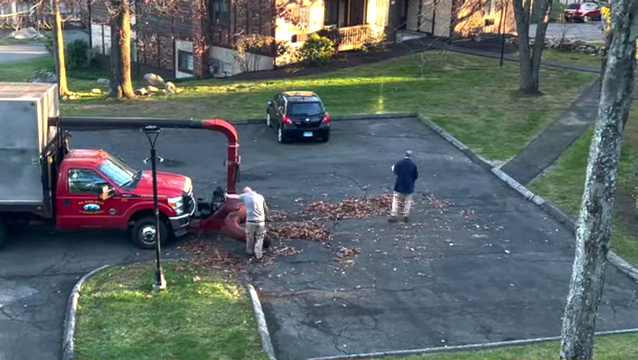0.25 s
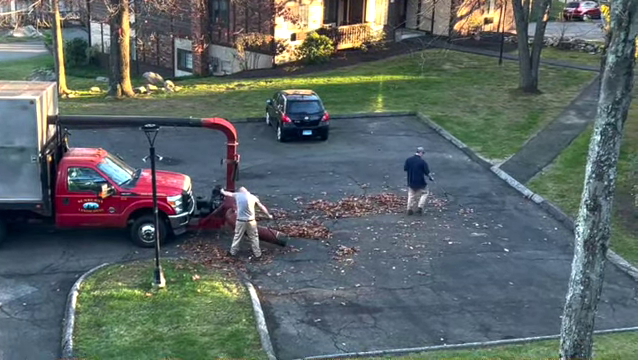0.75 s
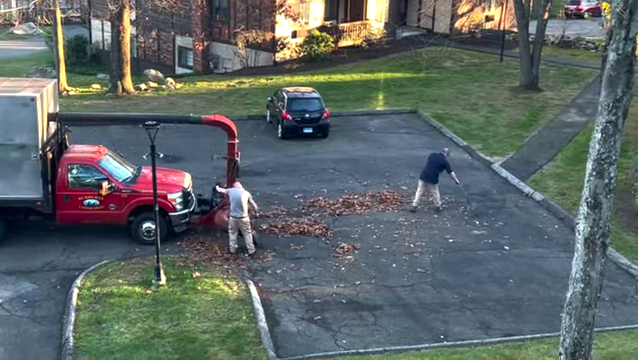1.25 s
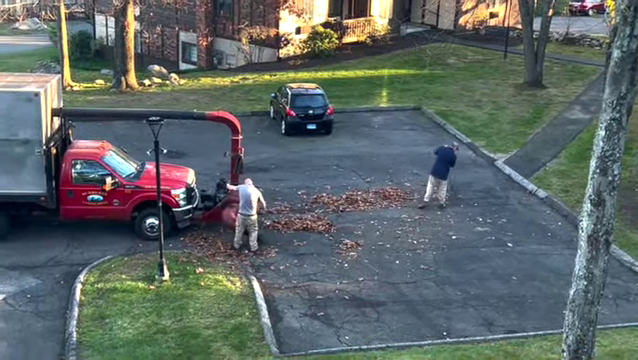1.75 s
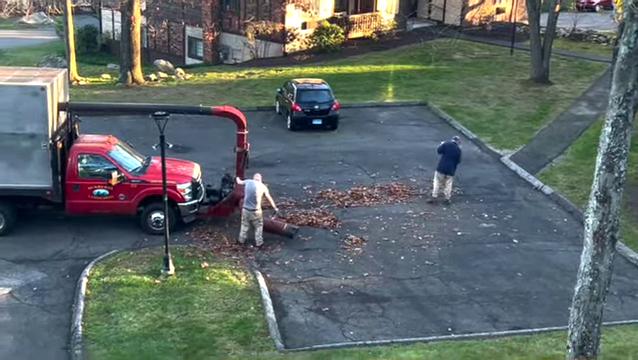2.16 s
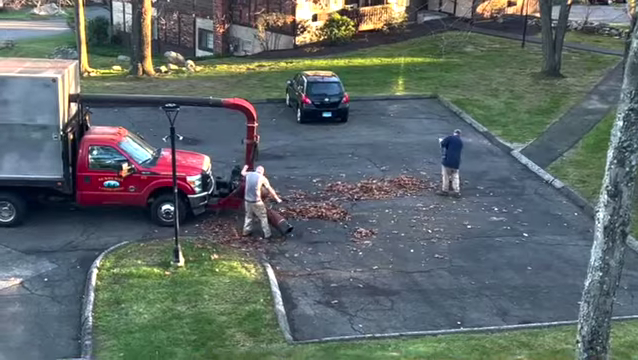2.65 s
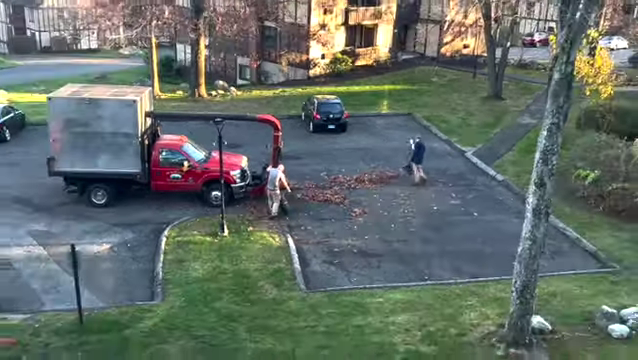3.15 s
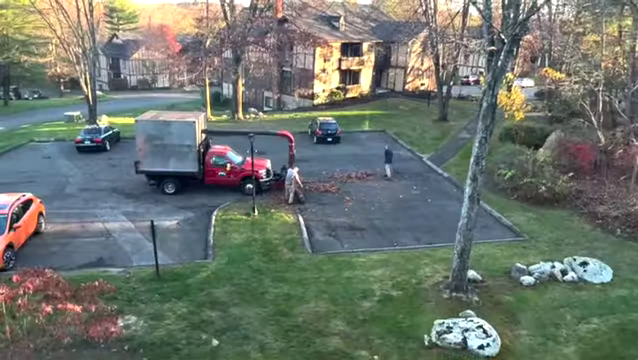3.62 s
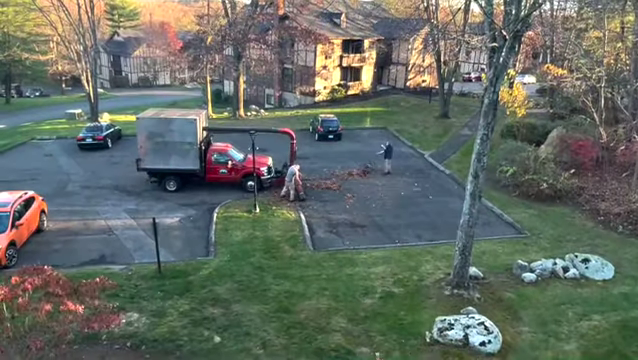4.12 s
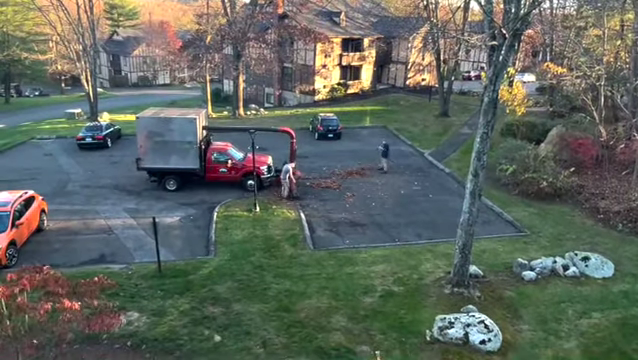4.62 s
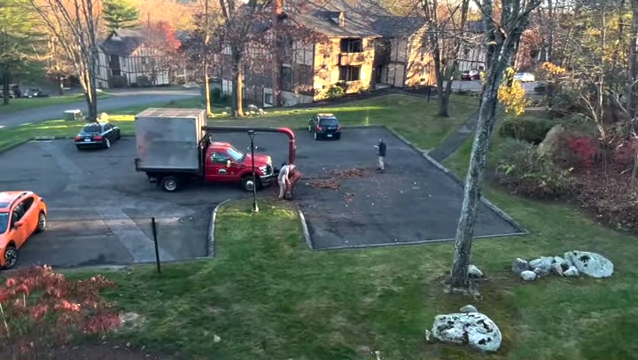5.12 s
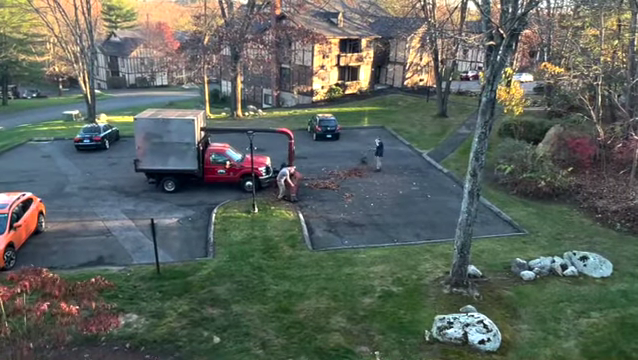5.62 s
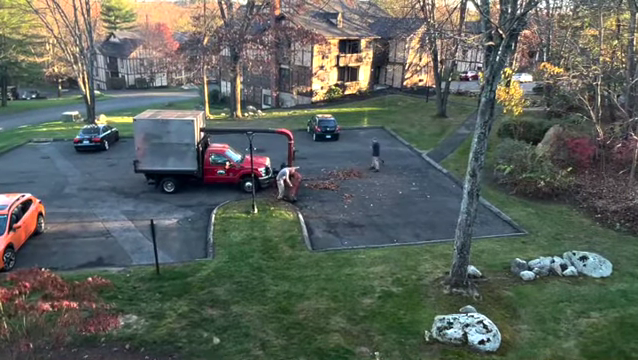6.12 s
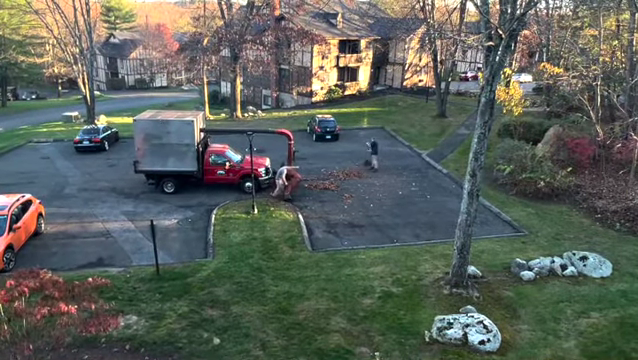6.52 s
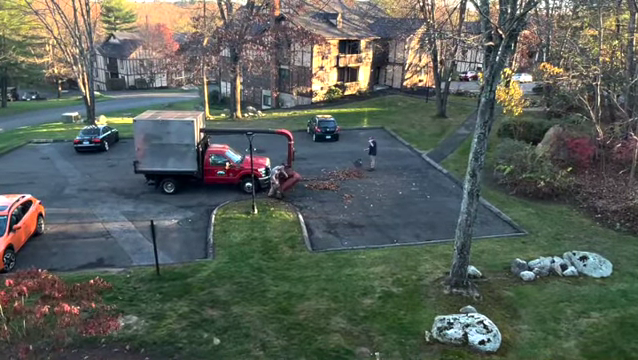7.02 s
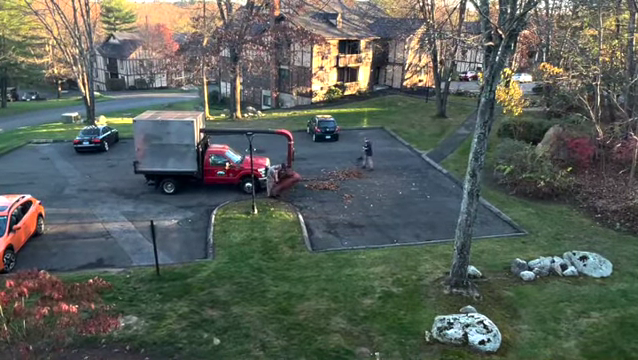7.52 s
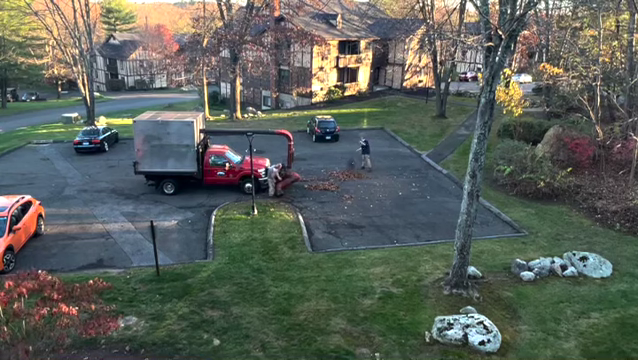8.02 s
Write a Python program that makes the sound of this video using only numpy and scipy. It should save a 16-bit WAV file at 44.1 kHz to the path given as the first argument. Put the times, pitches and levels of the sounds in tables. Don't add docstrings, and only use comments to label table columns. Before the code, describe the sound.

A leaf vacuum on a truck runs continuously in a parking lot, heard from a window above. Its uneven two-cylinder engine throbs at a fixed pitch under a wavering fan hum. Air roars through the wide hose, and leaves hiss in irregular gulps. Occasional hollow exhaust cracks poke through. The phone sound starts narrow and focused, then abruptly opens into wider stereo.

```python
import sys
import numpy as np
from scipy import signal
from scipy.fft import rfft, irfft, next_fast_len
from scipy.io import wavfile
from scipy.ndimage import uniform_filter1d, minimum_filter1d

SR = 44100
rng = np.random.default_rng(int(sys.argv[2]) if len(sys.argv) > 2 else 0)


def to_wav(s):
    ch = np.atleast_2d(s).T
    pcm = np.round(np.clip(ch, -1, 1) * 32767)
    wavfile.write(sys.argv[1], SR, pcm.astype(np.int16))


def boost(x):
    u = np.asarray(x, float) / 20
    return 10 ** u


N = 364707
STEP = 32
TIME = np.arange(0, N + STEP, STEP) / SR
CLOCK = np.arange(N) / SR
CYCLE_HZ = 24.0
WIDEN_S = 3.37


def fine(control):
    return np.interp(CLOCK, TIME, control)


def bumps(rows):
    return sum(db * np.exp(-((TIME - s) / half_s) ** 2) for s, half_s, db in rows)


def walk(rate_hz):
    k = int(SR / STEP / rate_hz)
    held = np.repeat(rng.standard_normal(len(TIME) // k + 1), k)
    slewed = uniform_filter1d(uniform_filter1d(held, k), k)
    return 1.23 * slewed[:len(TIME)]


def read(table, hz):
    f, db = np.transpose(table)
    return np.interp(np.log(hz + 1), np.log(f), db)


def causal(db):
    cep = irfft(db * np.log(10) / 20)
    half = len(cep) // 2
    cep[1:half] *= 2
    cep[half + 1:] = 0
    return np.exp(rfft(cep))


# (multiple of cycle rate [1], level [dB], left minus right [dB])
EXHAUST_LINES = [(1.95, -40, 2), (3.08, -31.5, 0.5), (3.893, -40, 2), (5.037, -25, -2), (5.927, -46.5, 2.5),
                 (7.014, -26.5, 0), (8.05, -39.5, -3.5), (8.93, -32.5, -6), (10.06, -30.5, 0),
                 (11.1, -58, 1.5), (11.8, -54.5, -2.5), (13.04, -37.5, 1.5), (13.81, -37, -3.5),
                 (15.2, -44, 1.5), (15.7, -49.5, 2.5), (16.6, -60.5, -5), (17, -51, -2.5),
                 (18.7, -55.5, 14.5), (20.1, -57, 0), (22.06, -51.5, -2.5), (21.9, -58, -1),
                 (23.3, -60.5, 3.5), (22.6, -61.5, -2.5), (24.64, -51, 1.5), (25.4, -45.5, -10),
                 (25.3, -57, -10.5), (28.55, -58, 10), (28.3, -45, 8.5), (30.47, -55, 4.5)]


def engine(rear_hz=192, rear_db=-1, scatter_db=.5, jitter_s=0.0002):
    firing_shares = .043, .631
    size, early, lead_cycles = 2 ** 14, 2 ** 12, 6
    hz = np.arange(size // 2 + 1) * SR / size
    order, db, pan_db = np.transpose(EXHAUST_LINES)

    rear = boost(rear_db) / (1 + 1j * order * CYCLE_HZ / rear_hz)
    pair = 1 + rear * np.exp(-2j * np.pi * order * (firing_shares[1] - firing_shares[0]))
    db = db - 20 * np.log10(np.abs(pair) * np.sqrt(2) * CYCLE_HZ / SR)
    edges_db = -40 * np.maximum(2 - hz / CYCLE_HZ, 0) - 24 * np.log2(np.maximum(hz / 800, 1))
    pipe = np.array([causal(np.interp(hz / CYCLE_HZ, order, db + side * pan_db / 2) + edges_db)
                     for side in (1, -1)])

    cycle = np.arange(int(N / SR * CYCLE_HZ) + lead_cycles)
    start = int(lead_cycles * SR / CYCLE_HZ)
    colours = 1, boost(rear_db) / (1 + 1j * hz / rear_hz)
    out = 0
    for share, colour in zip(firing_shares, colours):
        ring = np.roll(irfft(pipe * colour * np.exp(1.4j)), early, axis=1)
        jitter, scatter = rng.standard_normal((len(cycle), 2)).T
        fire_s = (cycle + share) / CYCLE_HZ + jitter_s * jitter
        train = np.zeros((1, N + 2 * start))
        train[0, (fire_s * SR).astype(int)] = boost(scatter_db * scatter)
        out = out + signal.fftconvolve(train, ring, axes=1)[:, start + early:start + early + N]
    return out


BLADE_DB = -29.5, -30.5, -43.5, -40
BLADE_WANDER_DB = 0.69, 0.98, 4.1, 1.2
# (time [s], half length [s], change [dB])
BLADE_SWELLS = [
    [(0.0, 0.51, -6), (.85, 0.44, 11.5), (2.38, 0.31, 12.5), (2.8, 0.23, 5), (3.1, 0.17, 2), (3.7, .25, 4.5), (4.2, 0.18, -2.5), (8.25, .2, 4)],
    [(.4, 0.6, -7), (1.9, .35, 3.5), (2.55, 0.44, 5.5), (3.58, 0.13, -10), (3.9, .15, 2.5), (7.0, 0.076, 2.5), (7.36, 0.16, -10.5), (7.6, 0.093, 3.5), (8.2, 0.16, 3.5)],
    [(0.0, 0.11, 2), (.45, 0.093, 3), (1.9, .25, 8.5), (3.2, .12, 7), (3.8, 0.11, 8.5), (4.85, 0.1, 9), (7.1, 0.21, 10), (7.75, 0.26, -16)],
    [(.4, 0.28, 5), (1.5, 0.12, -15), (2.1, 0.12, 8), (3.85, .12, 2.5), (4.95, 0.11, 6.5), (7.0, 0.091, 0)],
]
# (narrow beam [dB], wide beam [dB], sway [dB])
BLADE_PAN = [(-1.5, -9, 2.5), (-0.5, 3, 2), (-5, -5.5, 0), (-3, -3, 0)]
# (multiple of cycle rate [1], level [dB])
FIN_LINES = [(34, -53), (36, -48.5), (48, -52.5), (63, -55), (64, -71), (66, -56.5), (84, -54)]


def impeller(wide):
    shaft = 2 * np.pi * CYCLE_HZ * CLOCK
    opened = fine(wide)
    pans_db = [near + wide * (far - near) + sway * walk(3) for near, far, sway in BLADE_PAN]
    levels_db = [db + bumps(rows) + wander * walk(4)
                 for db, rows, wander in zip(BLADE_DB, BLADE_SWELLS, BLADE_WANDER_DB)]
    lags_rad = -.4 * wide - .15, -.1 + 0 * wide, 1.0 * wide, 0.099 + 0.29 * wide
    out = 0
    for k, (db, pan, lag) in enumerate(zip(levels_db, pans_db, lags_rad), 1):
        db = db + .5 * k * walk(9)
        drift = 0.59 * walk(1.48) + 0.051 * k ** 2 * walk(12)
        phase = k * (8 * shaft + .75) - 1.7
        out = out + np.array([fine(boost(db + side * pan / 2)) * np.cos(phase + fine(drift + side * lag))
                              for side in (1, -1)])
    for order, db in FIN_LINES:
        phase = order * shaft + fine(1.5 * walk(2.5))
        level = fine(boost(db + 3 * walk(3.03)))
        out = out + level * np.array([np.sin(phase), np.sin(phase + opened * order)])
    return np.sqrt(2) * out


# (frequency [Hz], density [dB per Hz])
DUCT_ROAR = [
    [(30, -67.5), (45, -61), (60, -48.5), (85, -51), (130, -51.5), (200, -47.5), (330, -53), (400, -55), (500, -61.5), (590, -55), (700, -64.5), (870, -60.5)],
    [(30, -65), (45, -53), (60, -53.5), (85, -48.5), (130, -52), (200, -51.5), (330, -52), (400, -57.5), (500, -65), (590, -58.5), (700, -62), (870, -62.5)],
]
# (frequency [Hz], density [dB per Hz])
LEAF_HISS = [
    [(1000, -69), (1200, -69.5), (1350, -69.5), (1500, -67.5), (1750, -73.5), (2100, -74.5), (2500, -73), (3000, -74.5), (3800, -76.5), (4500, -78), (5300, -80.5), (6300, -80.5), (7500, -82), (9000, -85)],
    [(1000, -71), (1200, -68.5), (1350, -71.5), (1500, -70.5), (1750, -75), (2100, -70.5), (2500, -77), (3000, -78.5), (3800, -79.5), (4500, -78.5), (5300, -82.5), (6300, -82), (7500, -87), (9000, -87)],
]
# (frequency [Hz], level [dB])
NOISE_WIDTH = [
    [(40, -22), (100, -18), (250, -12.5), (350, -20), (900, -12), (1700, -12), (2500, -18), (3300, -18), (8500, -36), (9300, 4.5), (9700, 11), (10500, 9.5), (11200, -10)],
    [(40, -20), (100, -11.5), (250, -9.5), (350, -11.5), (900, -5), (2000, -0.5), (3200, 4), (5200, 2.5), (6600, -0.5), (7100, 6.5), (8100, 3), (8800, -3), (9700, 12.5), (10500, 9), (11200, -10.5)],
]
# (frequency [Hz], left minus right [dB])
NOISE_LEAN = [(60, 2), (100, -4), (180, -6), (320, 2), (550, -2.5), (960, 0.5), (1680, -5.5), (2930, -0.5),
              (5100, 4.5), (8890, 1.5)]
# (time [s], half length [s], rise [dB])
GULPS = [(0.0, 0.18, 6), (.55, 0.34, 2.8), (.78, 0.067, 1.5), (1.03, .04, 3.5), (1.3, 0.17, 2.5),
         (1.59, .14, 5), (1.9, 0.05, 2.5), (2.82, 0.2, 4), (3.04, 0.066, 2), (3.215, 0.021, 5.5),
         (3.98, .15, 5.5), (4.78, 0.066, 3), (5.05, 0.13, 4), (5.32, 0.15, 8), (5.7, 0.1, 4),
         (5.92, 0.15, 5.5), (6.04, 0.028, 3), (6.35, 0.12, 3), (6.55, 0.13, 3.5), (6.8, 0.15, 8.5),
         (7.02, 0.12, 6), (7.17, 0.056, 2.5), (7.43, 0.16, 4), (7.75, 0.11, 3), (7.99, .13, 7.5),
         (8.17, .06, 1.5)]
# (time [s], half length [s], change [dB])
SURGES = [
    (.65, 0.42, -5.5),
    (1.55, .2, -6),
    (1.95, 0.27, -0.5),
    (2.9, .5, -2),
    (4.35, 0.39, 3.5),
    (5.75, .15, 2.5),
    (8.05, .1, -0.5),
]


def air(wide, puff_db=3, puff_share=0.075, flicker_db=1.0, patch_db=0.97):
    duct_dip = 265, -55.5
    duct_share, duct_rise_db_per_s, duct_flutter_db = .3, 0.2, 1.45
    size = next_fast_len(N, True)
    hz = np.arange(size // 2 + 1) * SR / size

    white = rfft(rng.standard_normal((2, size)))
    beams = []
    for roar, hiss, width in zip(DUCT_ROAR, LEAF_HISS, NOISE_WIDTH):
        density = sorted([*map(tuple, roar), duct_dip, *map(tuple, hiss), (9700, -99), (11300, -95)])
        mid_db = read(density, hz) + 10 * np.log10(SR / 2)
        side_db = mid_db + read(width, hz)
        beams.append(irfft(white * boost([mid_db, side_db]), size)[:, :N])
    opened = fine(wide)
    mid, side = beams[0] + opened * (beams[1] - beams[0])
    ears = rfft(np.array([mid + side, mid - side]), size)

    def around_mean(db):
        return db - np.where(wide > .5, db[wide > .5].mean(), db[wide <= .5].mean())

    gulps = bumps(GULPS)
    rise = duct_rise_db_per_s * np.minimum(TIME, WIDEN_S)
    duct = around_mean(duct_share * gulps + rise + duct_flutter_db * walk(20))
    rumble = around_mean(bumps(SURGES))
    leaves = around_mean(gulps + 0.77 * walk(45))

    cycles = TIME * CYCLE_HZ
    strength = .6 * rng.exponential(1, int(cycles[-1]) + 2)
    puff = strength[cycles.astype(int)] * np.exp(-(cycles % 1) / puff_share)

    out = 0
    octaves = np.log2((hz + 1) / 1000)
    for octave in np.arange(-7, 8) / 2:
        part = np.searchsorted(octaves, octave + 1 / 2)
        floor = -1 * (octave > -3.5)
        mask = np.cos(np.pi / 2 * np.clip(2 * (octaves[:part] - octave), floor, 1)) ** 2
        to_leaves = np.clip(octave / 1.57 - .3, 0, 1)
        db = 0.89 * rumble * np.clip(-2 - octave, 0, 1)
        db = db + np.clip(octave + 1.0, 0, 1) * ((1 - to_leaves) * duct + to_leaves * leaves)
        db = db + flicker_db * walk(9) + patch_db * to_leaves * walk(25)
        db = db + puff_db * np.exp(-(octave + .4) ** 2 / 0.59) * puff
        lean_db = read(NOISE_LEAN, 1000 * 2 ** octave) * np.array([[.5], [-.5]])
        lean = 1 + opened * (boost(lean_db) - 1)
        out = out + fine(boost(db)) * lean * irfft(ears[:, :part] * mask, size)[:, :N]
    return out


# (time [s], peak [dB])
PUFFS = [(0.124, -26), (0.167, -23.5), (0.292, -17), (0.666, -20), (0.75, -29), (0.792, -17.5),
         (0.834, -24.5), (1.95, -24.5), (3.501, -22), (3.584, -29), (4.124, -23), (4.291, -24),
         (4.953, -22), (4.999, -22), (5.497, -27), (6.249, -16.5), (6.5, -16), (6.573, -26), (7.084, -29),
         (7.416, -26.5), (7.458, -22), (7.792, -35)]


def cracks(shell_hz=760, ring_s=0.0049, rise_s=0.00098, under_db=-0.8):
    out = np.zeros(N)
    age = CLOCK[:1200]
    pitches = 1 + .07 * rng.standard_normal(len(PUFFS))
    for (s, db), pitch in zip(PUFFS, pitches):
        envelope = (1 - np.exp(-age / rise_s)) * np.exp(-age / ring_s)
        ring = envelope * np.sin(2 * np.pi * shell_hz * pitch * age)
        i = int(s * SR)
        out[i:i + len(age)] += 1.7 * boost(db + under_db) * ring
    return out * boost([[-1], [1]])


def scene():
    wide = np.clip((TIME - WIDEN_S) / 0.054, 0, 1)
    return engine() + cracks() + impeller(wide) + air(wide)


# (time [s], level [dB])
MUTE = [
    (0, -13),
    (3.4, -13),
    (4.5, -10.5),
    (5.0, -6.5),
    (8.27, -6),
]


def mute_bands(stereo, side_db=-17, quiet_db=-74.5, quiet_hz=10500, luck_db=2.2, spare=.3, gap_sigma=1.8,
               count=10):
    starved_hz, starved_db = (6900, 8200), 3
    blip_sigma = .7, 1.6
    left, right = stereo
    hz, s, (mid, side) = signal.stft(np.array([left + right, left - right]) / 2, SR, nperseg=2048)
    used = len(hz) // count * count
    hz = hz[:used, None]
    power = np.abs([mid[:used], side[:used]]).reshape(2, -1, count, len(s)) ** 2
    band_db = 10 * np.log10(uniform_filter1d(power.sum(2), size=2, axis=2) + 1e-18)
    luck = np.sqrt(2) * uniform_filter1d(rng.standard_normal(band_db.shape), size=2, axis=2)
    mid_db, other_db = np.repeat(band_db + luck_db * luck, count, axis=1)

    mute_db = np.interp(s, *np.transpose(MUTE)) + spare * (3 - np.interp(s, TIME, bumps(GULPS)))
    mute_db = mute_db + starved_db * (hz > starved_hz[0]) * (hz < starved_hz[1])
    gaps = np.repeat(luck[1] + np.roll(luck[1], 1, axis=1), count, axis=0) < -gap_sigma
    rarity = np.where(s < WIDEN_S, *blip_sigma) + (hz < 11100)
    blips = np.repeat(luck[0], count, axis=0) > rarity

    mid_heard = minimum_filter1d(mid_db - other_db > mute_db, size=2, axis=1) | (hz < 2400)
    mid[:used] *= mid_heard & (blips | (hz < 9700))
    side_heard = (other_db - mid_db > side_db) | (hz < 250)
    side_loud = (other_db > quiet_db) | (hz < quiet_hz)
    side[:used] *= side_heard & side_loud & ~(gaps & (hz > 7300))
    mid, side = signal.istft(np.array([mid, side]), SR, nperseg=2048)[1][:, :N]
    return np.array([mid + side, mid - side])


def top_cut(x):
    return signal.sosfilt(signal.butter(12, 11600, fs=SR, output="sos"), x)


def record(dry):
    mix = mute_bands(dry)
    return top_cut(mix)


dry = scene()
out = record(dry)
to_wav(out)
```